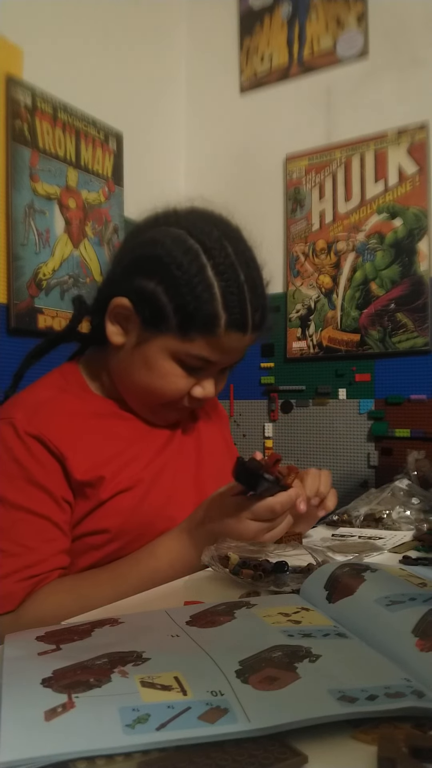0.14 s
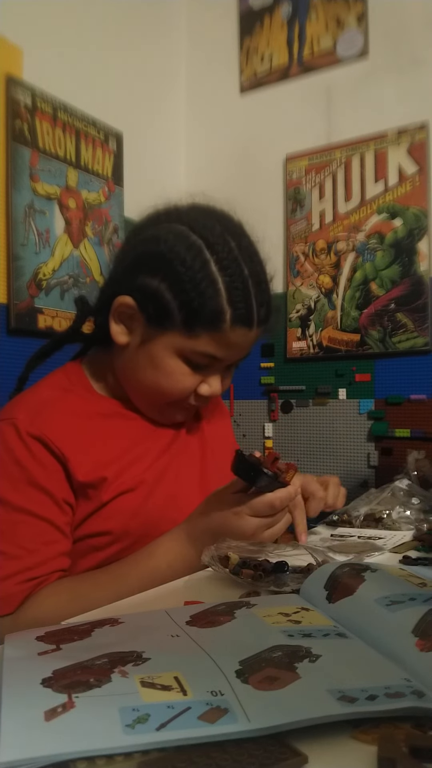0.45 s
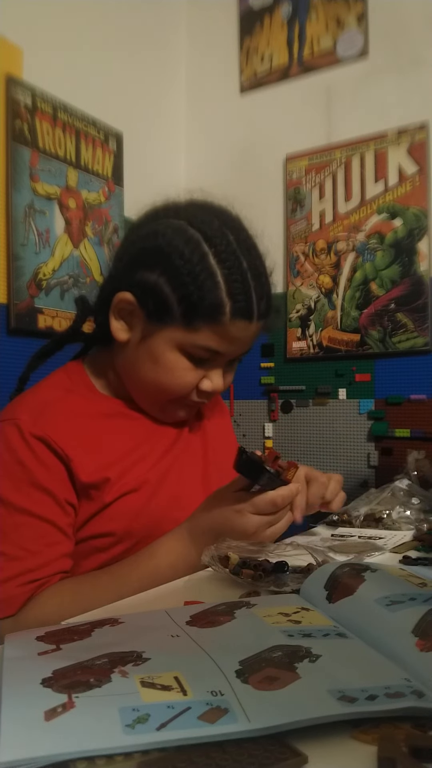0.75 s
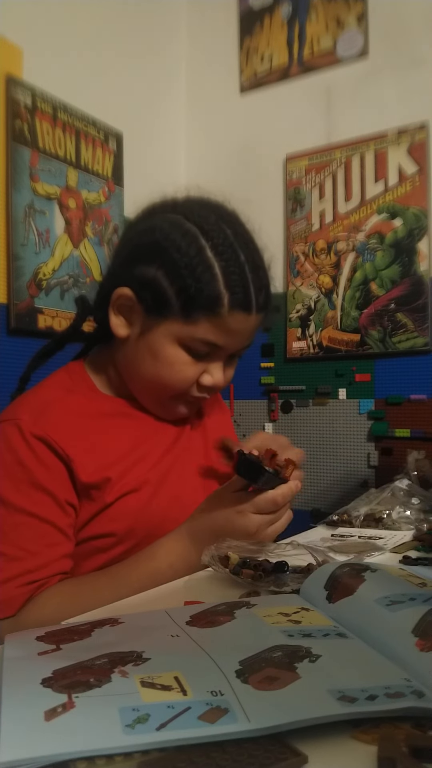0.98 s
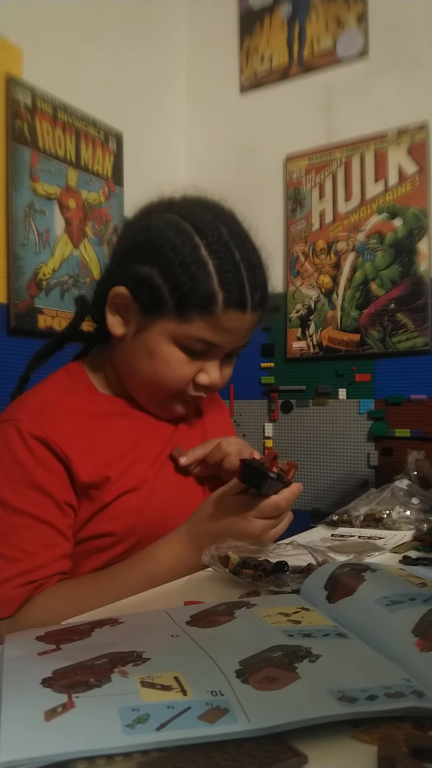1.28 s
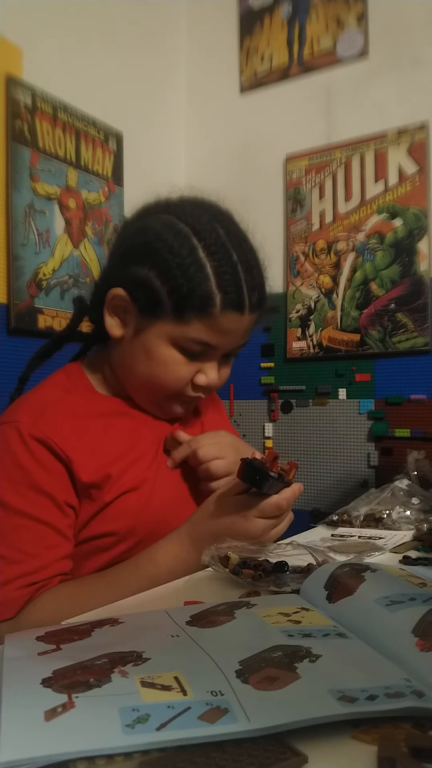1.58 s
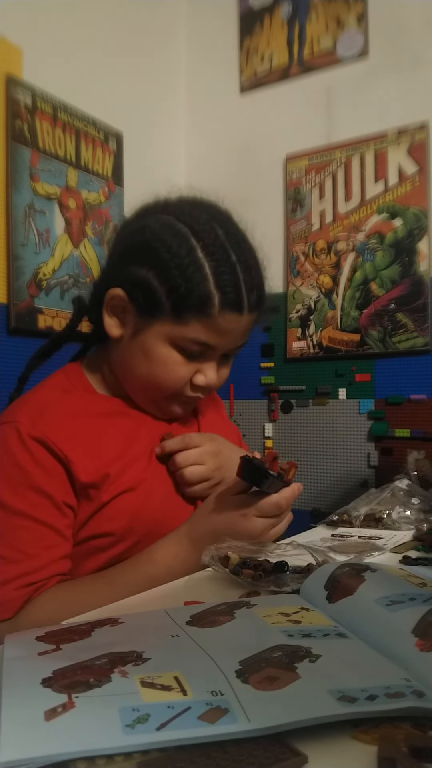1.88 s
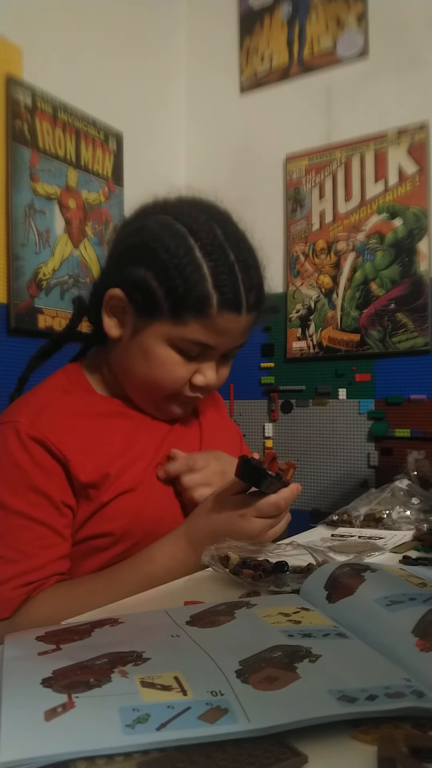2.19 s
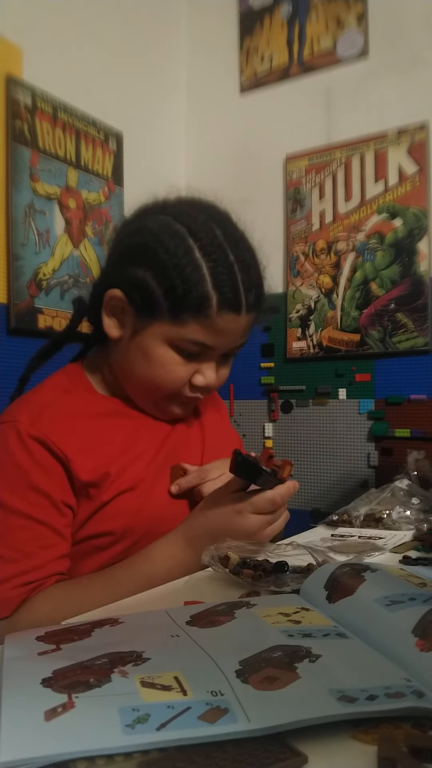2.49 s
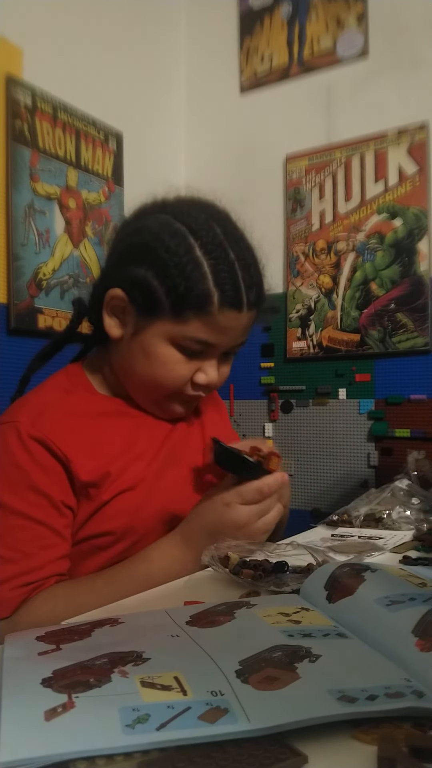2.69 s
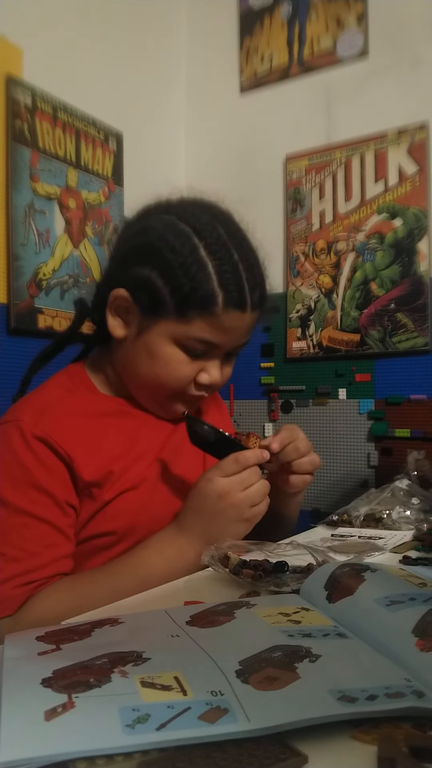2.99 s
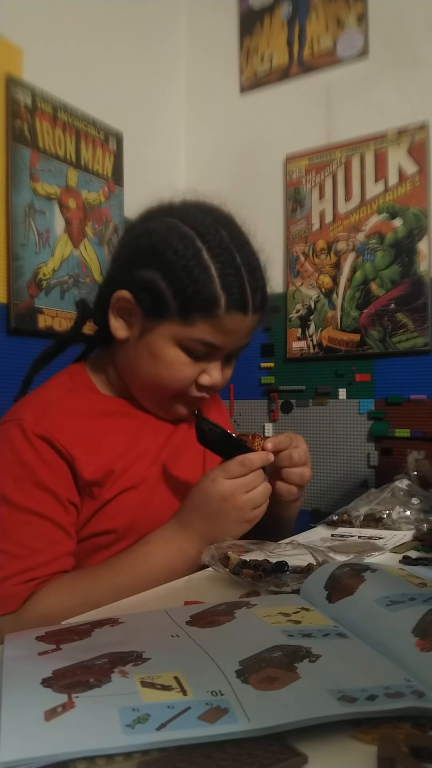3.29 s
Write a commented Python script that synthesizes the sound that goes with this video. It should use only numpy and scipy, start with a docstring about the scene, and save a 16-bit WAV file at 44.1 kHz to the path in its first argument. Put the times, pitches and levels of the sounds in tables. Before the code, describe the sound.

Plastic toy bricks clatter briefly and snap together by hand, with soft low bumps.

```python
"""In a small bedroom, small plastic bricks are picked off a table and pressed together by hand.
Bricks clack on the tabletop, then one is set down and pressed home with small creaks and a sharp snap.
More ticks and snaps follow between the fingers. Soft low bumps, probably from handling, reach the
microphone through its body. A far engine hums outside, over faint room noise."""
import sys
import numpy as np
from scipy import signal
from scipy.fft import rfft, irfft
from scipy.io import wavfile

SR = 44100
rng = np.random.default_rng(int(sys.argv[2]) if len(sys.argv) > 2 else 0)


def digitize_waveform(pressure):
    """Quantize a signal to 16-bit integers and store it at the path in sys.argv[1].

    Rows of a 2-D input are taken as channels; values are limited to [-1, 1].
    """
    field = np.atleast_2d(pressure).T
    bounded = np.clip(field, -1, 1)
    quanta = np.round(bounded * 32767).astype(np.int16)
    wavfile.write(sys.argv[1], SR, quanta)


N = 152145
T = np.arange(N) / SR
RING_T = T[:SR // 2]  # half a second for one hit to die away
HZ = np.fft.rfftfreq(N, 1 / SR) + 0.0008  # never zero, so dividing by it is safe
BUILD_UP = 1 - np.exp(-RING_T / 0.006)  # table and room take about 6 ms to answer a hit


def clacks():
    """Bricks clack on the table, then one is set down and pressed home with creaks and a sharp snap."""
    # five clacks, then the setting down and pressing:
    # t/s, level/dB, treble lift/dB, brick ring/dB, table and room tail/dB
    contacts = [(0.0, -36.5, -18.5, -34, 0), (0.0174, -17, 3, -30.5, -3.5), (0.0744, -20, -16, -31, -5.5),
                (0.0881, -20.5, -1, -13.5, -3.5), (0.1452, -23, -5.5, -23.5, -5.5),
                (0.4419, -50, -21, -17, 3.5), (0.5053, -49, -40, -18, -4), (0.5382, -42, -50, -20, -4.5),
                (0.562, -33, 23, 6.5, 0.5), (0.5918, -41, -5, -8, 4), (0.5992, -35.5, 1, -10.5, -2.5)]
    # tone of the crack: f/Hz, level/dB
    crack_colour = [(50, -31), (110, -1), (230, 5), (320, -6.5), (600, 0), (870, -8.5), (1150, -3.5),
                    (2050, -6.5), (2900, -8.5), (3400, -17), (4300, -22.5), (5300, -30), (6800, -26),
                    (8000, -33)]
    # ringing notes of the table and the parts lying on it: f/Hz, level/dB
    table_notes = [(126, -22), (228, -18.5), (252, -18.5), (352, -24), (493, -22), (547, -26), (664, -31.5),
                   (705, -22.5), (1056, -19.5), (1126, -16), (1170, -23.5), (1422, -23), (1495, -28),
                   (1760, -28), (1990, -25), (2880, -21.5)]
    # ringing notes of a loose brick: f/Hz, level/dB, fade time/s
    brick_notes = [(743, -25, .07), (1105, -13, .085), (1890, -20, .06), (2930, -32, .11), (5820, -39, .15),
                   (7140, -25, .18)]
    knock_hz, treble_hz = 1500, 3900
    knock = undb(-9) * np.sin(2 * np.pi * knock_hz * RING_T) * fade(t60=.007)  # the hollow body
    out = np.zeros(N)
    for start, db, treble_db, ring_db, tail_db in contacts:
        lift_db = treble_db / (1 + (treble_hz / HZ) ** 3)  # a harder contact is brighter
        crack = 2 * colour(contact(tail_db), crack_colour, lift_db)
        table = 0
        for hz, note_db in table_notes:
            decay = fade(t60=.16 * (1000 / hz) ** .2)  # higher notes die sooner
            table += undb(note_db) * decay * np.sin(2 * np.pi * (hz * RING_T + rng.random()))
        brick = sum(undb(note_db) * ring(hz, t60) for hz, note_db, t60 in brick_notes)
        sound = crack + knock + undb(tail_db) * table * BUILD_UP + undb(ring_db) * brick
        add(out, start, undb(db) * sound)
    return out


def snaps():
    """Studs catch between the fingers with thin ticks, each with the ring of its own part."""
    # parts meeting: t/s, level/dB, ring f/Hz, ring level/dB, fade time/s
    catches = [(0.5454, -78, 557, 19, .05), (0.6, -56, 2590, 4, 0.082), (0.638, -66, 2650, 9, 0.12),
               (1.925, -57.5, 2306, -11, 0.12), (1.932, -56.5, 7320, -10, .14),
               (1.9395, -59, 2250, 2, 0.12), (2.0603, -58.5, 4180, -18, 0.019),
               (2.371, -61.5, 3550, -23, .05), (3.1161, -58, 6240, -11, 0.054),
               (3.1164, -59, 1007, 6, 0.041), (3.118, -66.5, 3065, 5.5, 0.058),
               (3.147, -54.5, 1655, -10.5, 0.11)]
    # tone of a tick: f/Hz, level/dB
    tick_colour = [(200, -32), (950, -5), (1400, 5), (3100, 2), (4800, -1), (7000, -3.5), (8000, -12.5)]
    out = np.zeros(N)
    for start, db, hz, ring_db, t60 in catches:
        tick = 2 * colour(contact(room_db=-4), tick_colour)
        add(out, start, undb(db) * (tick + undb(ring_db) * ring(hz, t60) / 2))
    return out


def contact(room_db):
    """One sharp click and the brief chatter of a hollow brick, then the room's echoes."""
    echo_s, echo_spread_s, chatter_s = 0.0087, 0.0025, 0.0028
    tail = rng.standard_normal(len(RING_T)) * fade(t60=.155) * BUILD_UP
    echo_shape = np.exp(-.5 * ((RING_T - echo_s) / echo_spread_s) ** 2)
    echo = rng.standard_normal(len(RING_T)) * echo_shape  # first bounces from the corner
    room = undb(7) * tail / np.linalg.norm(tail) + undb(3) * echo / np.linalg.norm(echo)
    chatter = rng.standard_normal(len(RING_T)) * np.exp(-RING_T / chatter_s)
    direct = undb(4.5) * chatter / np.linalg.norm(chatter) / np.sqrt(2)
    direct[0] += 1  # the click itself
    bass_cut = signal.butter(1, 650, "high", fs=SR, output="sos")  # small parts give off little bass
    return signal.sosfilt(bass_cut, direct) + undb(room_db) * room


def ring(hz, t60):
    """A brick's note and nine weaker ones within 3% of it waver together as they die away."""
    detune, phase = rng.random((2, 9, 1))
    nearby_hz = hz * (1 + .06 * (detune - .5))
    nearby = np.sin(2 * np.pi * (nearby_hz * RING_T + phase)).sum(0)
    return (np.sin(2 * np.pi * hz * RING_T) + undb(-3) * unit(nearby)) * fade(t60)


def scrape():
    """A stud slides briefly with a thin, high hiss."""
    middle_s, spread_s, centre_hz, width_hz = 1.52, .045, 7150, 170
    band = 1 / (1 + ((HZ - centre_hz) / width_hz) ** 2)
    hiss = irfft(rfft(rng.standard_normal(N)) * band, N)
    return unit(hiss) * undb(-85) / np.cosh((T - middle_s) / spread_s)


def bumps():
    """Padded pushes swell and die within about two cycles, with a little rubbing, over a low rumble."""
    # soft bumps: middle t/s, level/dB, f/Hz
    pushes = [(0.11, -40.5, 97), (0.741, -43.5, 110), (1.006, -34.5, 108), (1.027, -39, 131),
              (1.051, -44, 117), (1.069, -37.5, 121), (1.087, -36.5, 126), (1.118, -40.5, 136),
              (1.152, -44, 106.3), (1.224, -36.5, 112), (1.31, -37.5, 117.6), (1.349, -41.5, 106),
              (1.369, -41.5, 110), (1.419, -37, 107), (1.502, -33, 119), (1.528, -35.5, 156),
              (1.554, -33, 108), (1.681, -37, 133), (1.699, -39.5, 102), (1.752, -41, 100), (1.8, -46, 106),
              (1.949, -41.5, 126), (2.098, -32.5, 127), (2.269, -43.5, 91.9), (2.442, -41, 92.3),
              (2.62, -48.5, 112.2), (2.714, -45, 97), (2.924, -48, 100.7), (2.987, -46, 136),
              (3.189, -39.5, 106), (3.308, -46.5, 119)]
    # tone of the rumble: f/Hz, level/dB
    rumble_colour = [(25, -37), (50, -14), (75, 6.5), (120, -0.5), (170, -7), (240, -10.5), (330, -31),
                     (600, -50.5)]
    # loudness of the rumble: t/s, level/dB
    rumble_levels = [(0, -49.5), (.3, -61.5), (.6, -54.5), (.9, -62.5), (1.1, -67.5), (1.5, -56.5),
                     (2.2, -64.5), (2.8, -68), (2.98, -57.5), (3.12, -68)]
    # tone of the rubbing in each bump: f/Hz, level/dB
    rubbing_colour = [(100, -3), (200, 9), (280, -9), (400, -20), (1400, -27.5), (4000, -44)]
    half_width_cycles, rub_spread_s = 0.53, 0.007
    rumble_db = np.interp(T, *np.array(rumble_levels).T)
    rumble = noise(rumble_colour) * undb(rumble_db)
    thuds, grip = np.zeros(N), np.zeros(N)
    for middle, db, hz in pushes:
        cycles = (T - middle) * hz
        near = np.abs(cycles) < 10
        swell = undb(db) / np.cosh(cycles[near] / half_width_cycles)
        thuds[near] -= swell * np.sin(2 * np.pi * cycles[near])
        grip[near] += undb(db) / np.cosh((T[near] - middle) / rub_spread_s)
    rubbing = undb(-21) * grip * noise(rubbing_colour)
    return rumble + rubbing + thuds


def engine():
    """A far engine speeds up, then eases off and fades; only its lowest tones pass the wall."""
    # the engine's run: t/s, firing rate f/Hz, level/dB
    run = [(0, 75.54, -68), (0.298, 76.9, -61.5), (0.602, 78.8, -55.5), (0.949, 82.28, -55),
           (1.498, 86.33, -57.5), (2.0, 83.83, -65), (3.45, 80.4, -73)]
    # tones of the hum: multiple of the firing rate, level/dB
    tones = [(1, -4), (2, -3), (4, -24.5)]
    times, hz, db = np.array(run).T
    firings = np.cumsum(np.interp(T, times, hz)) / SR
    hum = sum(undb(tone_db) * np.sin(2 * np.pi * (k * firings + rng.random())) for k, tone_db in tones)
    return np.sqrt(2) * hum * undb(np.interp(T, times, db))


def room_noise():
    """Faint room noise; its lower part starts louder and slowly sinks while the hiss stays."""
    # tone of the room noise: f/Hz, level/dB
    air_colour = [(160, -29), (280, -10.5), (349, -6.5), (520, -9.5), (590, -3), (767, -13), (1110, -9),
                  (1810, -15.5), (7600, -23.5), (9880, -38)]
    low_hz, fall_db_per_s = 2900, 1.66
    air = noise(air_colour) * undb(-77.5)
    low = irfft(rfft(air) / (1 + (HZ / low_hz) ** 4), N)
    return air + low * (undb(fall_db_per_s * (T[-1] - T)) - 1)


def undb(db):
    """Turn decibels into a number to multiply by."""
    return 10 ** (np.asarray(db) / 20)


def unit(x):
    """Scale a sound to an average (rms) level of 1."""
    return x / np.sqrt(np.mean(x ** 2))


def fade(t60):
    """A fade that drops 60 dB in t60 seconds."""
    return np.exp(-np.log(1000) * RING_T / t60)


def colour(x, points, extra_db=0):
    """Shape a sound's tone along a curve of (f/Hz, level/dB) points."""
    hz, db = np.array(points, float).T
    gain = undb(np.interp(np.log(HZ), np.log(hz), db) + extra_db)
    cepstrum = irfft(np.log(gain), N)[:2048]
    cepstrum[1:] *= 2  # makes the filter ring after a hit, never before it
    response = irfft(np.exp(rfft(cepstrum, 8192)))[:4096]
    return signal.fftconvolve(x, response / np.linalg.norm(response))[:len(x)]


def noise(points):
    """Steady noise at level 1 with the given tone."""
    return unit(colour(rng.standard_normal(N), points))


def add(out, start, sound):
    """Mix a sound in at a time given in seconds."""
    i = max(int(start * SR), 0)
    out[i:i + len(sound)] += sound[:N - i]


def scene():
    """Everything sits in the middle; only the bricks' treble spreads a little to left and right."""
    bricks = clacks() + snaps() + scrape()
    smear = unit(rng.standard_normal(256)) / np.sqrt(256)
    spread = signal.fftconvolve(bricks, smear)[:N]
    wide_above_hz = 7200
    side = undb(-47.5) * irfft(rfft(spread) / (1 + (wide_above_hz / HZ) ** 8), N)
    return bricks + bumps() + engine() + room_noise() + side * np.array([[1], [-1]])


def record(dry):
    """The recorder steeply cuts the treble above 7600 Hz."""
    return signal.sosfilt(signal.ellip(8, .3, 60, 7600, fs=SR, output="sos"), dry)


dry = scene()
out = record(dry)
digitize_waveform(out)
```